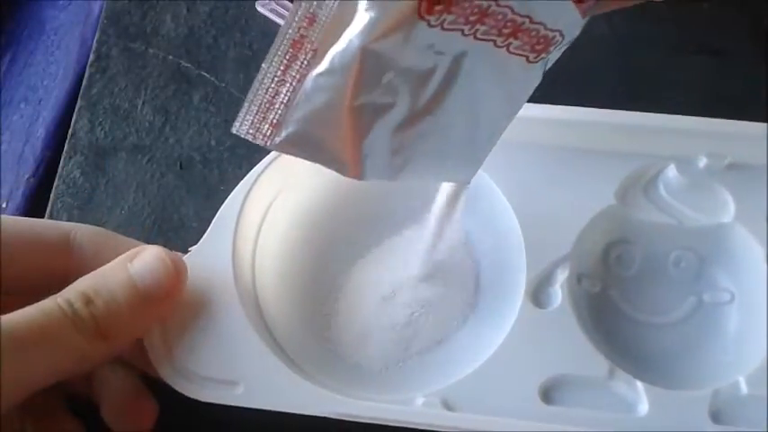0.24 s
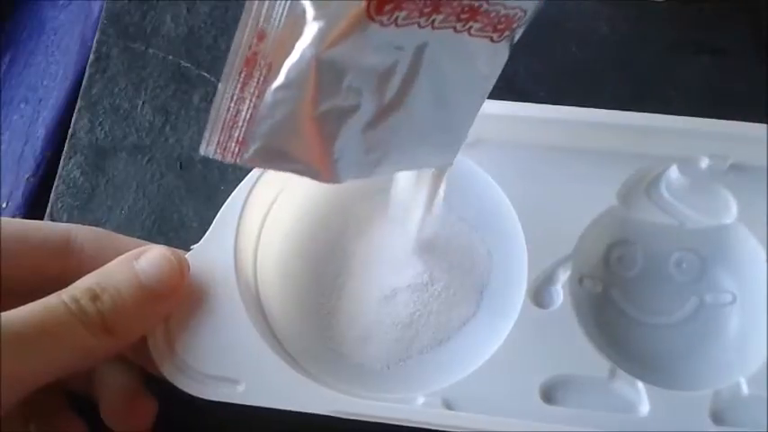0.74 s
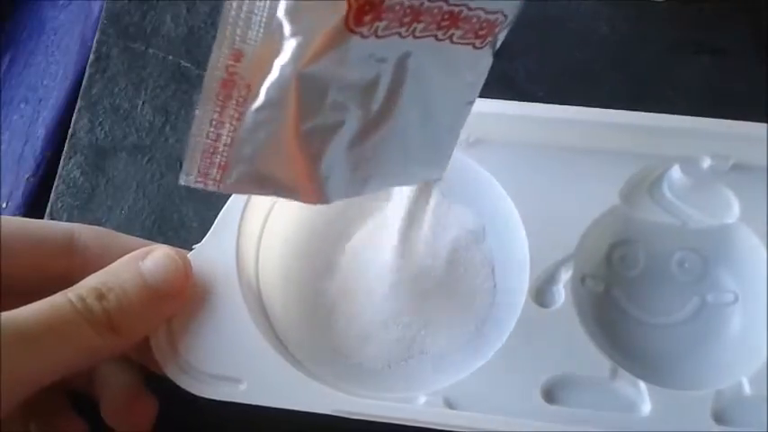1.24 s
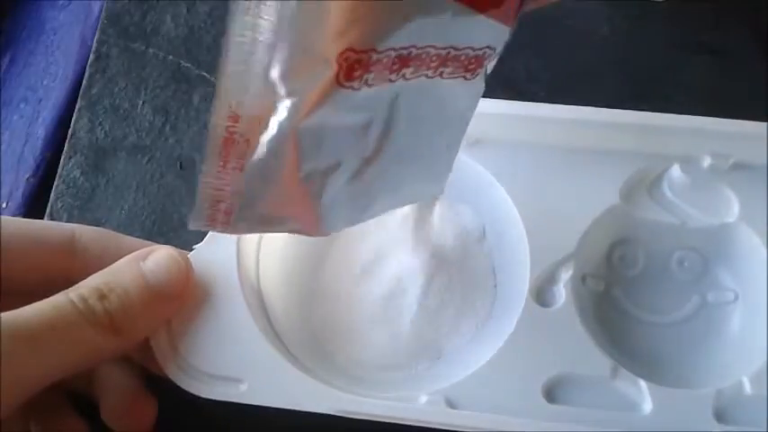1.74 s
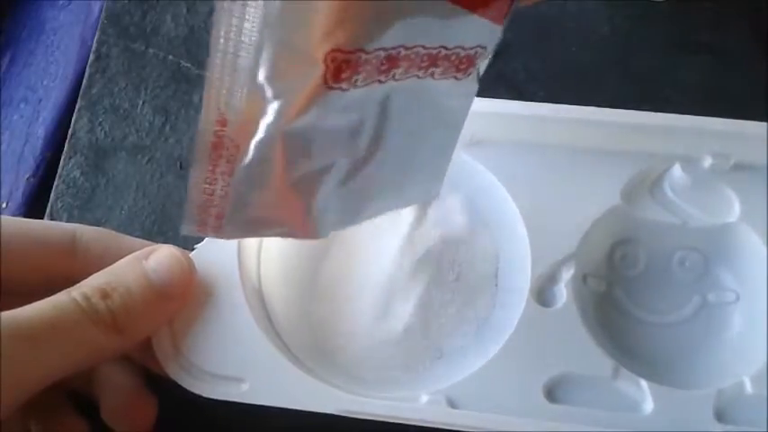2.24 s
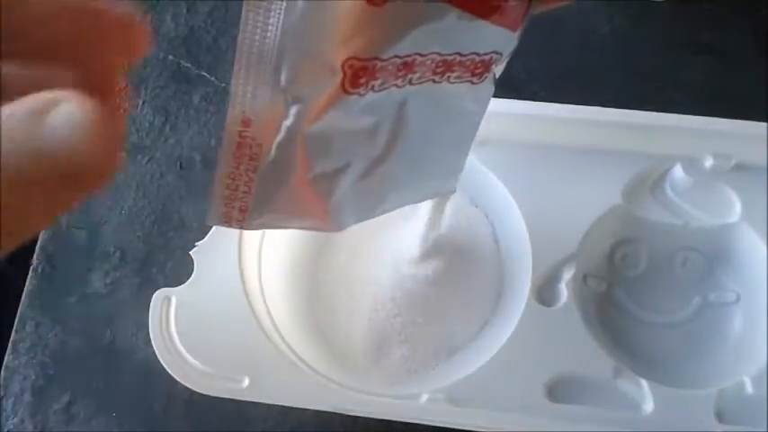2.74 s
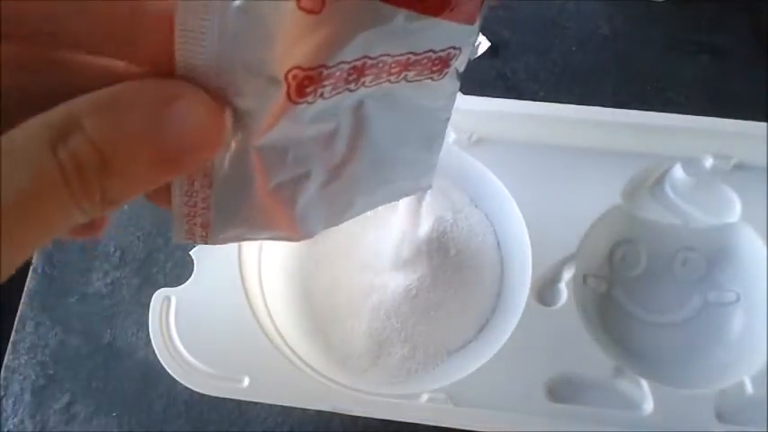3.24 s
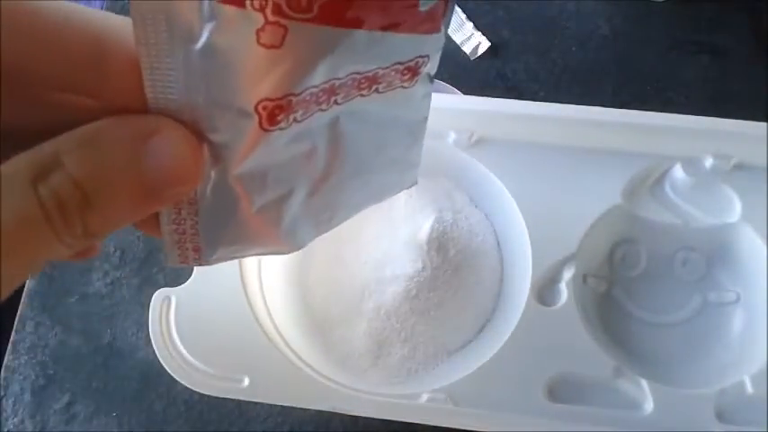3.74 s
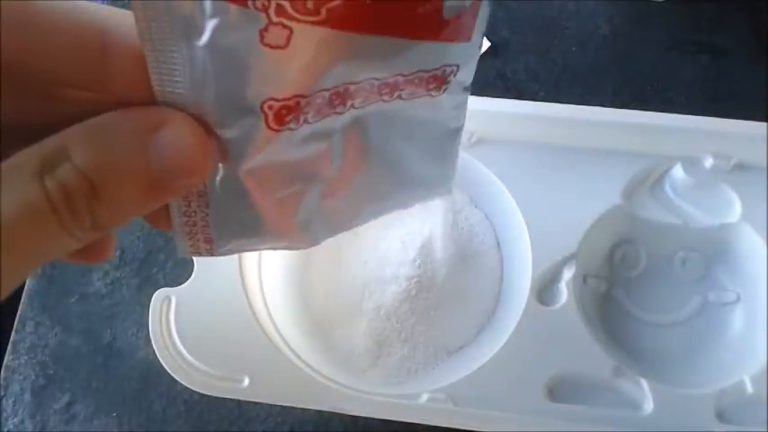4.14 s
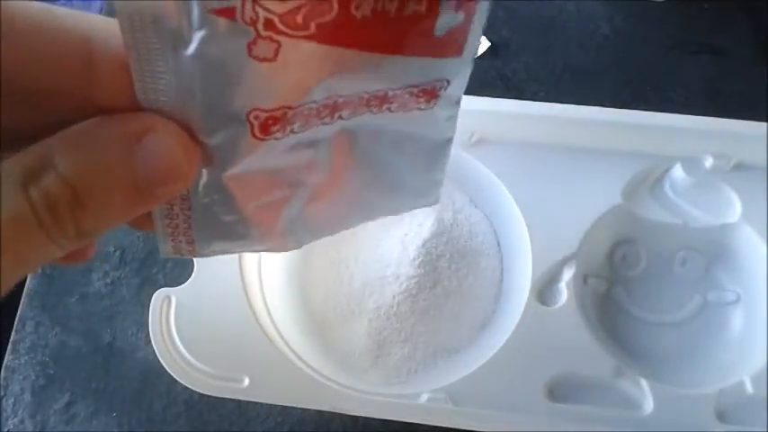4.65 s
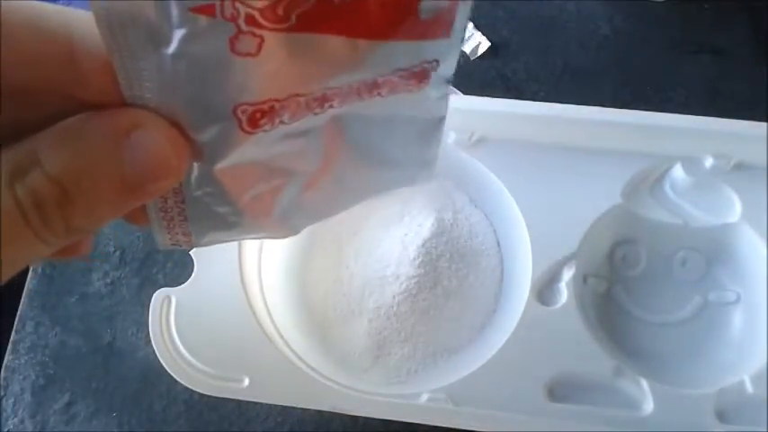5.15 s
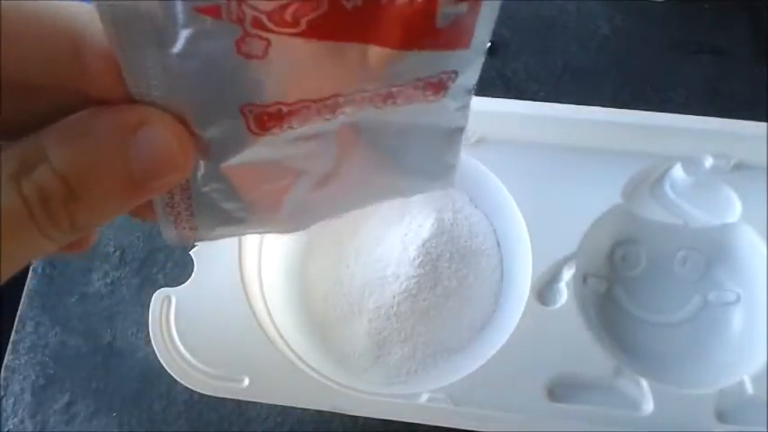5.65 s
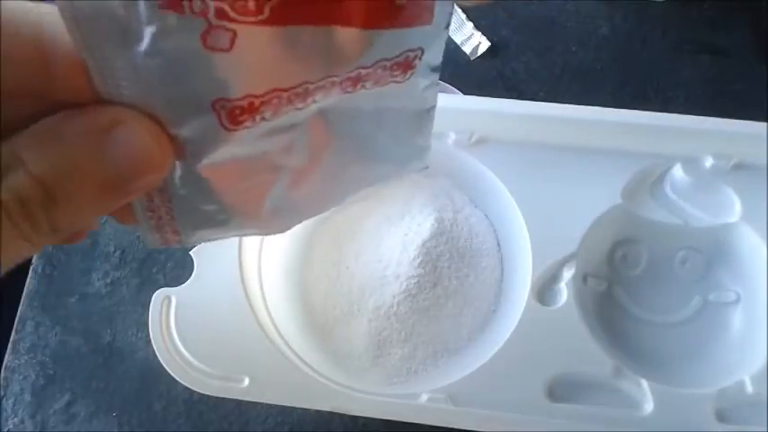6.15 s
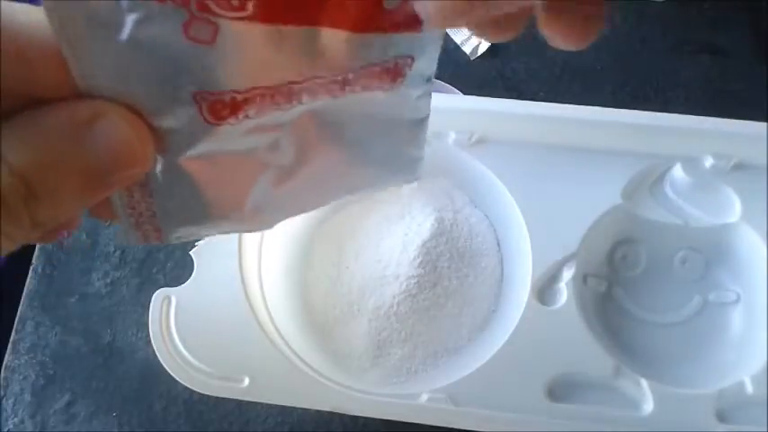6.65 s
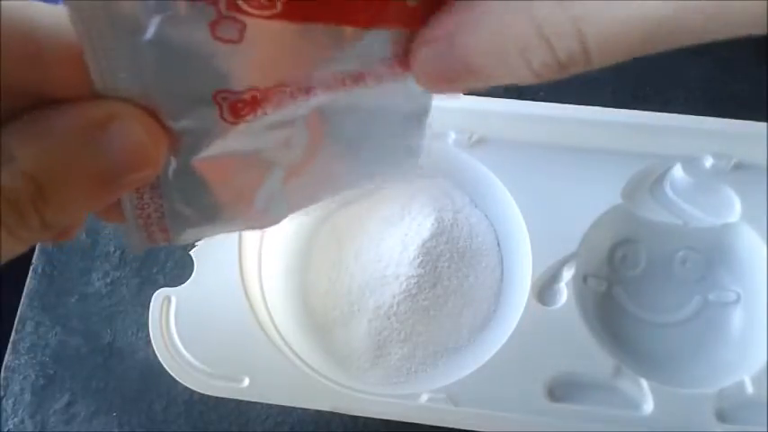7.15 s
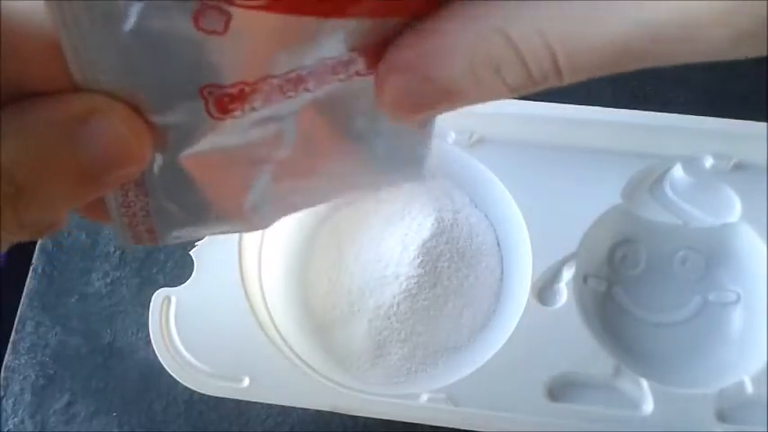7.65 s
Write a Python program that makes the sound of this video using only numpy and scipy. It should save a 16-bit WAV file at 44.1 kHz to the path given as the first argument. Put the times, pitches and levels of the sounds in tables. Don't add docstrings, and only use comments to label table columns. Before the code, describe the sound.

Close to the microphones in a quiet, faintly rumbling room, dry powder pours from a foil packet into a thin plastic tray, hissing in uneven surges. A few foil snaps and one small ringing knock interrupt it. The pour stops, and fingers tap the packet in quick crackling clusters, pause briefly, then tap and pinch it with louder, sharp pops.

```python
import sys
import numpy as np
from scipy import signal
from scipy.fft import rfft, irfft, next_fast_len
from scipy.io import wavfile
from scipy.ndimage import uniform_filter1d, map_coordinates

SR = 44100
rng = np.random.default_rng(int(sys.argv[2]) if len(sys.argv) > 2 else 0)


def to_wav(s):
    ch = np.atleast_2d(s).T
    pcm = np.round(np.clip(ch, -1, 1) * 32767)
    wavfile.write(sys.argv[1], SR, pcm.astype(np.int16))


def makeup_ratio(level_db):
    decades = np.asarray(level_db, float) / 20
    return 10 ** decades


N = 347949

STEADY_TOP_HZ = 14560
POUR_ENDS_S = 4.425


def unit(x):
    return x / np.sqrt(np.mean(x ** 2) + 1e-20)


def along(points, hz):
    f, v = np.transpose(points)
    return np.interp(np.log(hz + 1), np.log(f + 1), v)


def curve(rows):
    seconds, values = np.transpose(rows)
    return np.interp(np.arange(N) / SR, seconds, values)


def wobble(rate):
    knots = rng.standard_normal(int(N * rate / SR) + 4)
    return map_coordinates(knots, [np.arange(N) * rate / SR])


def swells(rows, fall_db=None):
    t = np.arange(0, N / SR + .01, .002)
    power = sum(makeup_ratio(db - (fall_db or own[0]) * np.abs(t - s)) ** 2 for s, db, *own in rows)
    return np.interp(np.arange(N) / SR, t, np.sqrt(power))


def filtered(x, response):
    m = next_fast_len(N + 8192)
    return irfft(rfft(x, m) * response(np.fft.rfftfreq(m, 1 / SR)), m)[..., :N]


def band(x, lo_hz, hi_hz):
    y = signal.sosfilt(signal.butter(2, [lo_hz, hi_hz], "band", fs=SR, output="sos"), x)
    return y / np.abs(y).max(axis=-1, keepdims=True)


def even(x):
    z = rfft(x)
    bumps = np.sqrt(uniform_filter1d(np.abs(z) ** 2, size=50, axis=-1) + 1e-12)
    return irfft(z / bumps, x.shape[-1]) * np.linalg.norm(x, axis=-1, keepdims=True)


def ringing(spectrum, rings):
    def gain(hz):
        lift = sum(db / (1 + (2 * (hz - c) / w) ** 2) for c, w, db in rings)
        return makeup_ratio(along(spectrum, hz) + lift)
    return gain


def grains(response, spread_db):
    sizes = makeup_ratio(spread_db * rng.standard_normal(N))
    return unit(filtered(rng.standard_normal(N) * sizes, response))


# f/Hz, likeness (0 to 1)
ALIKE = [(60, 0.89), (130, 0.82), (290, 0.38), (640, 0.14), (1400, 0.038)]


def diffuse(spectrum):
    def shape(hz):
        turn = np.arccos(np.clip(along(ALIKE, hz), -1, 1)) / 2
        return makeup_ratio(along(spectrum, hz)) * [np.cos(turn), np.sin(turn)]
    mid, side = filtered(rng.standard_normal((2, N)), shape)
    return unit(np.array([mid + side, mid - side]))


# f/Hz, level/dB per Hz
ROOM_TONE = [(18, -47), (30, -36), (139, -3), (200, -3.5), (247, -6.5), (355, -13.5), (597, -15),
             (1200, -19.5), (1780, -24.5), (6000, -33), (15000, -42)]
# f/Hz, level/dB per Hz
RUMBLE = [(25, -57), (36, -10), (48, 2.5), (62, -3), (80, -35.5)]
# t/s, level/dB
DEEP_SWELLS = [(.83, -63), (1.14, -62.5), (1.84, -62), (2.37, -62.5), (2.92, -64.5), (3.47, -65),
               (4.7, -61), (5.47, -78), (6.78, -64), (7.48, -61)]
# f/Hz, level/dB per Hz
DRONE = [(55, -26), (75, -8), (105, 0.5), (150, -21), (250, -33.5)]
# t/s, level/dB
DRONE_SWELLS = [(1.8, -69.5), (2.37, -63.5), (3.5, -64.5), (5.3, -60), (7.1, -65), (7.89, -60.5)]


def background():
    deep_db, deep_fall_db_per_s = -74, 71
    drone_db, drone_fall_db_per_s = -73, 17.5
    room_db, leans_db = -65, 0.5
    deep_gain = np.hypot(makeup_ratio(deep_db), swells(DEEP_SWELLS, deep_fall_db_per_s))
    rumble = deep_gain * makeup_ratio(2.5 + 0.58 * wobble(4.3)) * diffuse(RUMBLE)
    drone_gain = np.hypot(makeup_ratio(drone_db), swells(DRONE_SWELLS, drone_fall_db_per_s))
    drone = drone_gain * makeup_ratio(3.0 + 0.7 * wobble(16)) * diffuse(DRONE)
    room = makeup_ratio(room_db) * diffuse(ROOM_TONE)
    return (room + drone) * makeup_ratio([[-leans_db], [leans_db]]) + rumble


def tapping():
    return np.clip((np.arange(N) / SR - POUR_ENDS_S) / 0.027, 0, 1)


# f/Hz, level/dB per Hz
HISS = [(800, -24.5), (1800, -17), (3300, -7), (5000, -1), (6100, -4.5), (7700, -4.5), (9500, -6.5),
        (12500, -9.5), (14500, -12.5)]
# f/Hz, width/Hz, lift/dB
BOWL_RINGS = [(3040, 240, 1.5), (5200, 430, 1.5), (6750, 250, 2.5), (7930, 550, 4), (10100, 550, 0.5)]
# t/s, level/dB
TRICKLE = [(0, -64.5), (1.0, -59.5), (1.8, -68.5), (2.4, -79), (3.06, -77), (3.3, -62), (3.8, -66.5),
           (4.0, -65.5), (4.4, -64.5)]
# t/s, peak level/dB, fall/dB per s on both sides
SURGES = [(.085, -65, 62), (.254, -61, 78), (.429, -60.5, 36), (.614, -57, 89), (.973, -55.5, 63),
          (1.327, -49, 165), (1.452, -57.5, 126), (1.696, -59.5, 70), (1.856, -56, 65), (1.99, -57.5, 150),
          (2.105, -56, 173), (2.215, -54.5, 183), (2.335, -53.5, 193), (2.439, -53, 218),
          (2.569, -53.5, 103), (2.88, -55, 108), (3.258, -52.5, 139), (3.567, -59.5, 68),
          (3.741, -57.5, 80), (4.116, -61, 90), (4.31, -54, 198)]


def pouring():
    direct = microphones(grains(ringing(HISS, BOWL_RINGS), spread_db=2.5))
    stream = direct + makeup_ratio(-5.5) * diffuse(HISS)
    flow = np.hypot(makeup_ratio(curve(TRICKLE)), swells(SURGES))
    uneven = makeup_ratio(2.5 + 1.06 * wobble(14) + 1.0 * wobble(45) + 0.81 * wobble(160))
    return (1 - tapping()) * flow * uneven * stream


# t/s, peak level/dB, panel f/Hz, thump level/dB, body level/dB
REGRIP = [(1.877, -44.5, 7710, -24, -13), (2.5138, -31.5, 4030, -27, -21), (2.6637, -53, 2300, -5.5, -0.5),
          (3.118, -49, 3050, -28, -25), (3.1303, -48, 1960, -26, -27), (3.242, -31.5, 3220, -25, -12),
          (3.253, -41, 2540, -18.5, -15), (4.0954, -39.5, 2530, -26, -16), (4.109, -29.5, 2270, -30, -20),
          (4.131, -39, 5370, -29, -11), (4.2142, -44.5, 7660, -16, -13), (4.2632, -47.5, 6690, -9.5, -1.5),
          (4.3224, -33.5, 4840, -20, -7), (4.3545, -41, 8350, -25, -21), (4.4319, -35, 8500, -22, -12.5),
          (4.4405, -44, 5740, -23, -9), (4.4614, -35.5, 2420, -27, -15)]
NEIGHBOURS = [(4.3063, -15.5, 3600, -32.5, -20), (4.1762, -53, 2000, 0, -1), (4.2975, -34, 3130, -33, -9),
              (4.301, -23.5, 2440, -22.5, -21), (4.3122, -25, 2750, -26, -15),
              (4.4496, -42, 5760, -25, -23.5), (5.0217, -40.5, 2700, -15, 1.5),
              (5.4219, -31, 6200, -13, -16), (5.4298, -29, 2550, -20, -22), (5.4994, -15, 2810, -39, -26),
              (5.7085, -39, 1990, -13, -3), (7.098, -41, 4500, -10, 3), (7.4696, -29, 5200, -18, -12),
              (7.4788, -26, 5600, -14, -13), (7.4804, -31.5, 5600, -14.5, -11),
              (7.6056, -45, 6500, -8, -12), (7.7299, -42, 6350, -10, -26)]
FURTHER_SNAPS = [(3.4459, -52, 5040, -22, -20), (3.7353, -49, 5500, -20, -17), (4.276, -46.5, 2010, -7, 4),
                 (4.3493, -50, 3000, -13, -8), (4.6498, -47, 4000, -18, -15), (4.7778, -58.5, 1800, -14, 4),
                 (4.9645, -51, 1900, -10, 5), (5.1119, -39, 4500, -15, -15), (5.1395, -27.5, 3100, -16, -12),
                 (5.5038, -25, 4440, -28, -29), (5.5318, -26, 6370, -26, -24), (6.11, -51.5, 5000, -20, -20),
                 (7.3591, -59, 2000, -3, 3.5), (7.3708, -50, 4500, -8, -3), (7.4127, -52, 1800, 0, 8),
                 (7.4255, -27, 4000, -20, -32), (7.5196, -56, 2500, -6, 3), (7.7568, -50, 2000, -2, 9),
                 (5.426, -31.5, 4500, -18, -18), (6.7745, -48, 5000, -14, -11)]
LIGHT_TAPS = [(4.5337, -50, 5330, -5, -3), (4.554, -39.5, 4400, -20, -3.5), (4.5848, -39.5, 2280, -22, -3),
              (4.643, -47, 3100, -13, -22), (4.6745, -30.5, 5430, -23.5, -34),
              (4.6922, -31.5, 2930, -23.5, -27), (4.7518, -45.5, 5600, -12, -9),
              (4.8339, -31, 1760, -30, -6.5), (4.857, -42, 5550, -20, -20), (4.8658, -36, 5770, -19, -23),
              (4.8818, -38, 8700, -16.5, -3), (4.9338, -27.5, 2950, -19, -26),
              (4.9524, -36.5, 3840, -16, -4), (4.9761, -37, 3830, -22, -11), (5.0399, -29, 4860, -24, -13),
              (5.0525, -31.5, 5140, -24, -24), (5.0612, -31.5, 2800, -19, -15),
              (5.1063, -34, 5760, -14, -20), (5.1155, -32.5, 5100, -18, -6),
              (5.1262, -31.5, 4600, -23, -13), (5.1366, -23.5, 2980, -17.5, -11.5),
              (5.1427, -37, 3220, -24, -13), (5.157, -26, 3130, -19.5, -4)]
TICKS = [(4.5398, -48, 5000, -11, -14), (4.755, -49, 5500, -15, -15), (4.8603, -47, 5730, -14, -20),
         (4.9698, -37, 3800, -19, -9), (5.0346, -42, 4680, -12, -20), (5.1694, -51, 7300, -18, -16),
         (5.2095, -45, 7500, -20, -13), (5.2346, -33.5, 4900, -18, -17), (5.2416, -31, 3140, -15, -24),
         (5.5016, -22, 4670, -33, -30), (5.5919, -35, 6300, -18, -9), (5.6135, -34, 7960, -18, -18),
         (5.699, -43, 6500, -18, -18), (5.7832, -34, 5000, -16, -21), (5.8289, -41.5, 4870, -17, -15),
         (6.4076, -63, 1930, 0, -5), (6.6303, -44, 3850, -18, -20), (6.7472, -39.5, 4900, -17, -10),
         (6.8704, -32, 3700, -22, -20), (7.0007, -40, 3730, -16, -16), (7.3883, -36, 4100, -13, -16),
         (7.4846, -41, 5200, -20, -17), (7.4944, -37, 4340, -11, -16), (7.7446, -44, 4540, -16, -14),
         (7.7894, -36.5, 4740, -11, -19), (7.8344, -39, 4550, -15, -16)]
HARD_TAPS = [(5.2218, -27, 5250, -26, -14), (5.238, -25, 3000, -17.5, -14.5), (5.2603, -30, 3020, -15, -27),
             (5.3198, -29, 5850, -10, -19), (5.3256, -24, 3150, -24, -25), (5.3693, -21, 2930, -23, -14),
             (5.4162, -28, 6100, -22, -23), (5.4241, -29, 3070, -25, -25),
             (5.4960, -19.5, 6000, -14.5, -11.5), (5.5056, -17, 4800, -29, -27),
             (5.5299, -20.5, 4700, -27, -19.5), (5.5476, -38, 5030, -8, -13), (5.567, -30.5, 3920, -12, -9),
             (5.5968, -29, 6240, -12, -9), (5.6085, -30, 6300, -16, -17), (5.6182, -26.5, 8530, -21, -14),
             (5.667, -26, 5200, -17, -21), (5.6784, -30.5, 5100, -24, -15),
             (5.763, -39.5, 5050, -13.5, -15), (5.7805, -29.5, 6800, -28, -22),
             (5.7857, -26.5, 3000, -21, -20.5), (5.8335, -34, 5000, -20, -19)]
LAST_TAPS = [(6.4781, -48.5, 2040, -6, -25), (6.4939, -34, 4740, -21, -33), (6.6227, -45, 3680, -7.5, -4),
             (6.6827, -36, 3900, -13.5, -24), (6.7129, -30.5, 4950, -9.5, -22), (6.7551, -40, 4860, -23, 3),
             (6.7697, -39.5, 4600, -13, -3), (6.8005, -35.5, 2230, -24, -25),
             (6.8537, -33.5, 4700, -18, -6.5), (6.8634, -17.5, 4900, -28, -20),
             (6.875, -26.5, 5140, -13.5, -12), (6.8996, -33.5, 3630, -19, -10),
             (6.9656, -42.5, 4900, -11, 4.5), (6.9837, -39, 5170, -7, -4), (6.996, -43.5, 5400, -5.5, -11),
             (7.005, -26.5, 3960, -31, -17), (7.1192, -37, 2990, -8, -1), (7.1935, -39, 5800, -11, -10),
             (7.1992, -33, 5560, -9, -25), (7.2964, -23.5, 4700, -28, -19), (7.3035, -31, 4500, -14.5, -14)]
SEAM_POPS = [
    (7.1012, -17, 5030, -27, -21),
    (7.4225, -15.5, 4270, -27, -20),
    (7.4887, -16.5, 6000, -27, -24),
    (7.8854, -28, 5200, -19, -33),
]
PINCH = [(7.3785, -32, 4740, -16, -27), (7.3855, -25.5, 5300, -21, -17), (7.4003, -33.5, 4780, -10, -13),
         (7.4318, -39, 4100, -19, -25), (7.4496, -31, 4120, -25, -22), (7.5562, -26.5, 4740, -18.5, -22),
         (7.5675, -24.5, 4580, -13.5, -14.5), (7.588, -33, 5450, -18, -13), (7.5947, -44, 4700, -1, 0.5),
         (7.672, -33.5, 4600, -11, -4.5), (7.6809, -27, 4600, -23, -26), (7.7185, -30.5, 4480, -9.5, -22),
         (7.7605, -38, 4500, -4, -13), (7.8116, -37, 2500, -11, -9), (7.8218, -22.5, 5700, -22, -33),
         (7.8472, -43, 4730, -11, -22), (7.863, -35, 6390, -15, -29)]


def creases():
    gestures = [
        (REGRIP, -11), (LIGHT_TAPS, -16.5), (HARD_TAPS, -17.5), (LAST_TAPS, -22), (PINCH, -24.5),
        (SEAM_POPS, -2), (NEIGHBOURS, -16), (TICKS, -24), (FURTHER_SNAPS, -28)]
    brighter_per_octave_db, brighter_per_db = 4.5, 0.34
    events = []
    for snaps, gesture_db in gestures:
        for snap in snaps:
            pitch_db = brighter_per_octave_db * np.log2(snap[2] / 4000)
            hardness_db = brighter_per_db * (snap[1] + 27)
            events.append((*snap, gesture_db + pitch_db + hardness_db))
    return events


def foil(events):
    s, db, panel_hz, thump_db, body_db, bright_db = np.transpose(events)[:, :, None]
    lead_s, tearing_s = .008, 0.0015
    partner_ratio, partner_db, flip_db = 1.3, -4.5, 3.5
    t = np.arange(SR // 12) / SR - lead_s
    after = np.clip(t, 0, None)
    flipped = t > 0
    chance = rng.standard_normal((len(events), 6, len(t)))
    uneven = makeup_ratio(1.2 * rng.standard_normal((len(events), 6, 1)))

    def fade(k, t60, hold=0):
        decay = makeup_ratio(-60 * np.clip(t - hold, 0, None) / (t60 * uneven[:, k]))
        return chance[:, k] * decay * (1 - np.exp(-after / 0.00016))

    partner_hz = panel_hz * partner_ratio ** np.sign(5000 - panel_hz) * uneven[:, 2] ** 0.18
    notes = np.sin(2 * np.pi * panel_hz * t) + makeup_ratio(partner_db) * np.sin(2 * np.pi * partner_hz * t)
    flutter = 1 + 0.69 * band(chance[:, 0], 106, 980) / 0.32
    panel_decay = makeup_ratio(-60 * after / (0.0082 * uneven[:, 0])) * (1 - np.exp(-after / 0.0003))
    panel = flutter * panel_decay * notes

    creak = chance[:, 1] * makeup_ratio(1700 * t) * (t < 0) * (1 - (t / lead_s) ** 2)
    tearing = even(fade(1, 0.0064, tearing_s)) * flipped + makeup_ratio(-17) * creak
    settling = fade(2, 0.1) * makeup_ratio(7.0 * chance[:, 0])
    octaves = np.log2(panel_hz / 4000)
    dull = band(band(tearing, 2200, 4560), 900, 5900)
    keen = band(band(tearing, 2660, 8500), 2000, 9370)
    crackle = band(band(settling, 1460, 7350), 930, 8200)
    crack = makeup_ratio(-7 - 6.0 * octaves) * dull + makeup_ratio(-4 + 3.0 * octaves) * keen + makeup_ratio(-17.5) * crackle

    sparkle = band(even(fade(3, 0.0053)) * flipped, 8300, 13800)
    flip = band(band(even(fade(1, 0.0015)) * flipped, 1750, 8750), 860, 9500)
    sound = makeup_ratio(-3) * panel + makeup_ratio(-1.0) * crack + makeup_ratio(bright_db - 4.5) * sparkle
    sound += makeup_ratio(flip_db + 0.18 * bright_db) * flip

    body = band(even(fade(4, .016)) * flipped, 480, 1700)
    thump = band(fade(5, .03), 70, 400)
    low = makeup_ratio(body_db) * body + makeup_ratio(thump_db + 4.0) * thump

    at = np.round((s - lead_s + .0002) * SR).astype(int) + np.arange(len(t))
    place = rng.standard_normal((len(events), 2))
    shift = np.round(.9 * place[:, :1]).astype(int)
    aside_db = 3.2 * place[:, 1:] - 0.15 * (bright_db + 25.5)

    def lay(where, x):
        return np.bincount(where.ravel(), (makeup_ratio(db + 1.5) * x).ravel(), N + SR)[:N]

    left = lay(at + shift, makeup_ratio(aside_db) * sound + makeup_ratio(-3.0) * low)
    return np.array([left, lay(at, sound + low)])


# t/s, level/dB
TRAY_KNOCK = (2.514, -41)
TRAY = [
    (1197, -11, 0.22),
    (2900, 5, 0.074),
    (3920, 17, 0.033),
    (4730, 10.5, 0.047),
    (6000, 3, 0.034),
]


def tray():
    knock_s, knock_db = TRAY_KNOCK
    t = np.clip(np.arange(N) / SR - knock_s, 0, None)
    ring = np.zeros(N)
    for hz, db, t60 in TRAY:
        shake = 2.0 * (hz / 5000) ** 2 * wobble(350)
        ring += makeup_ratio(knock_db + db - 60 * t / t60) * np.sin(2 * np.pi * hz * t + shake)
    return (1 - np.exp(-t / 0.0014)) * ring


# f/Hz, level/dB per Hz
SHEET = [(500, -9), (2300, -3.5), (3700, -2.5), (4700, -3), (5700, -8.5), (6600, -5), (7600, -12),
         (10000, -18), (14500, -42)]
# f/Hz, width/Hz, lift/dB
SLACK_RINGS = [(2980, 250, 1), (4260, 500, 2), (4900, 200, 3), (6480, 320, 6), (7600, 250, 5)]
# f/Hz, width/Hz, lift/dB
TAUT_RINGS = [(3000, 250, 3), (4600, 510, 7), (5800, 270, 6), (6300, 380, 11), (7550, 300, 8)]
# t/s, level/dB
SLIDE_LEVEL = [(4.42, -84.5), (4.55, -92), (4.9, -84), (5.1, -75.5), (5.4, -87), (5.78, -75), (6.12, -85.5),
               (6.25, -98), (6.5, -110),
               (6.7, -84), (6.85, -80), (7.16, -91), (7.38, -85), (7.52, -69), (7.62, -73), (7.7, -63.5),
           (7.89, -59.5)]


def sliding():
    taut_from_s = 6.6
    slack = grains(ringing(SHEET, SLACK_RINGS), spread_db=4.0)
    taut = grains(ringing(SHEET, TAUT_RINGS), spread_db=4.0)
    sheet = np.where(np.arange(N) / SR < taut_from_s, slack, taut)
    slide = microphones(sheet) + makeup_ratio(-8.5) * diffuse(SHEET)
    return tapping() * makeup_ratio(curve(SLIDE_LEVEL) + 14.0 + 1.07 * wobble(60)) * slide


WALLS = [(200, 0.075), (2000, 0.056), (6000, .04), (11000, 0.02)]


def walls(x):
    size = 4096
    blocks = np.pad(x, (0, -N % size)).reshape(-1, size)
    hz, t, z = signal.stft(rng.standard_normal((2, len(blocks), size)), SR, nperseg=256)
    dying = z * makeup_ratio(-60 * t / along(WALLS, hz)[:, None])
    tails = signal.istft(dying, SR, nperseg=256)[1][..., :size]
    tails = tails / np.linalg.norm(tails, axis=-1, keepdims=True)
    wet = signal.fftconvolve(blocks[None], tails, axes=-1)
    own = wet[..., :size].reshape(2, -1)
    spill = np.pad(wet[..., size:], ((0, 0), (1, 0), (0, 1))).reshape(2, -1)
    return own[:, :N] + spill[:, :N]


# t/s, delay/ms
LAG = [(0, .11), (3.8, .13), (4.2, .17), (7.89, 0.19)]
# f/Hz, level/dB
SHADE = [(100, -2.5), (2400, -1), (4200, -2), (5500, -7), (8100, -14), (11000, -9), (15000, -5)]


def microphones(x):
    left, right = np.broadcast_to(x, (2, N))
    late = map_coordinates(left, [np.arange(N) - curve(LAG) * SR / 1000])
    return np.array([filtered(late, lambda hz: makeup_ratio(along(SHADE, hz))), right])


def scene():
    steady = background() + pouring() + sliding()
    clicks = foil(creases()) + tray()
    near = microphones(clicks + makeup_ratio(-11.5) * walls(clicks[1]))
    steady = filtered(steady, lambda hz: hz < STEADY_TOP_HZ)
    return steady + filtered(near, lambda hz: makeup_ratio(-18 * (hz > STEADY_TOP_HZ)))


def roll_off(x):
    return signal.sosfilt(signal.butter(12, 15840, fs=SR, output="sos"), x)


def record(dry):
    return roll_off(dry)


dry = scene()
out = record(dry)
to_wav(out)
```